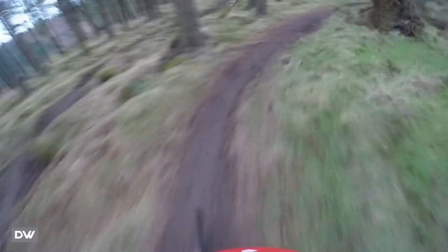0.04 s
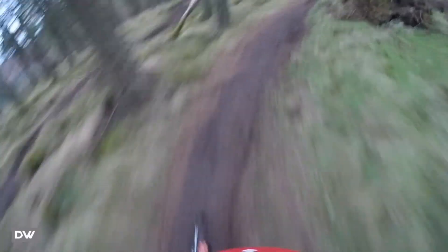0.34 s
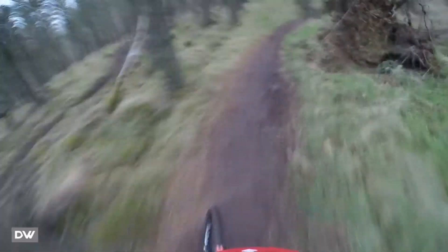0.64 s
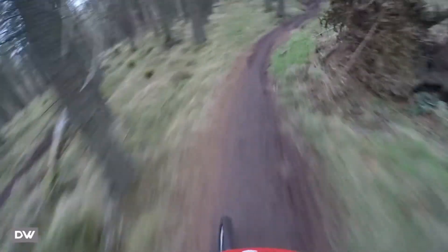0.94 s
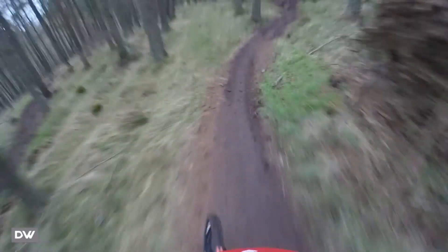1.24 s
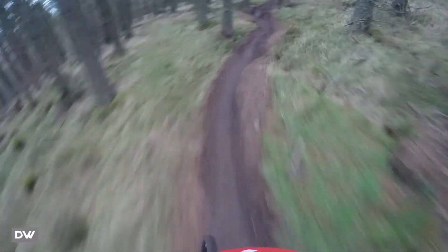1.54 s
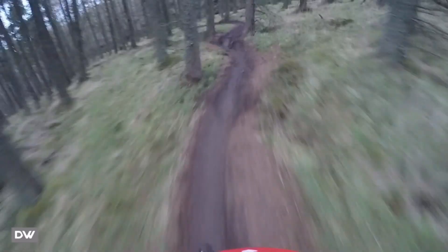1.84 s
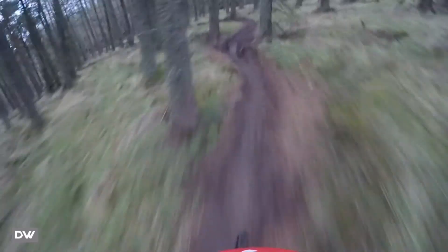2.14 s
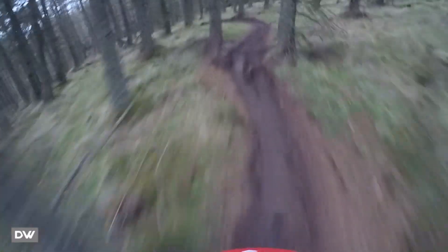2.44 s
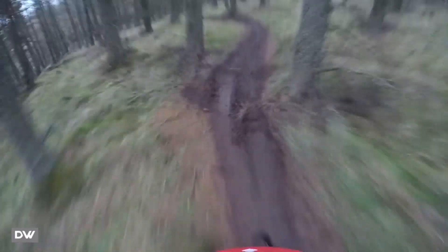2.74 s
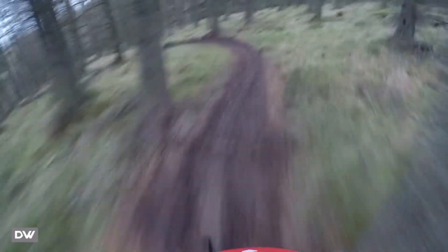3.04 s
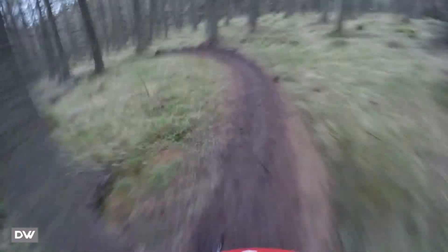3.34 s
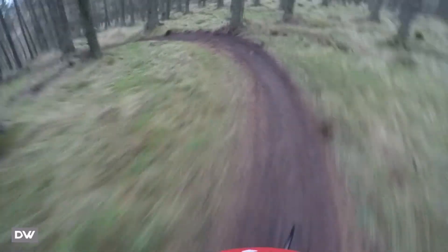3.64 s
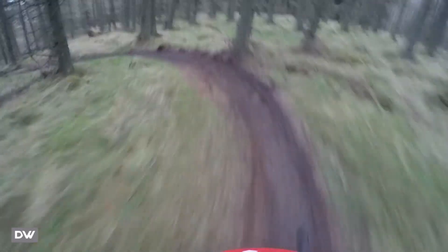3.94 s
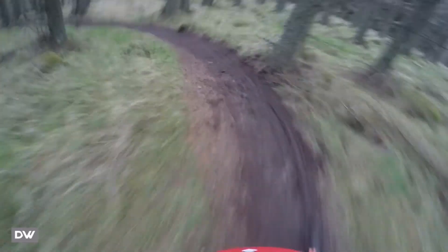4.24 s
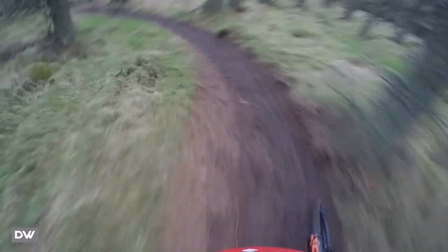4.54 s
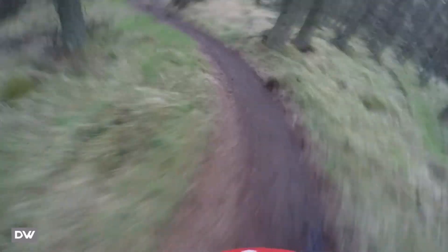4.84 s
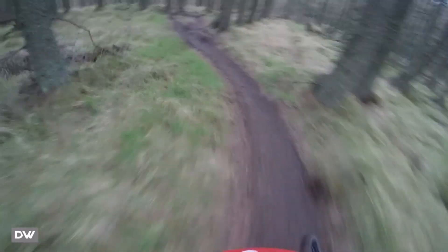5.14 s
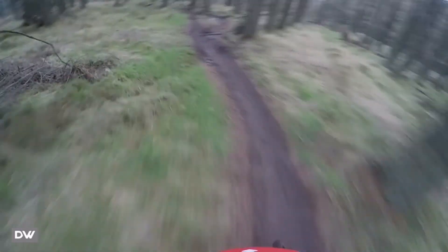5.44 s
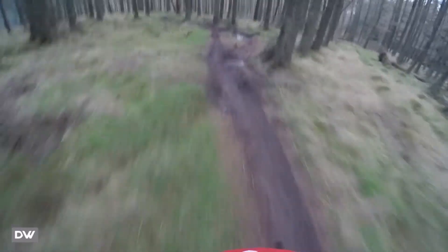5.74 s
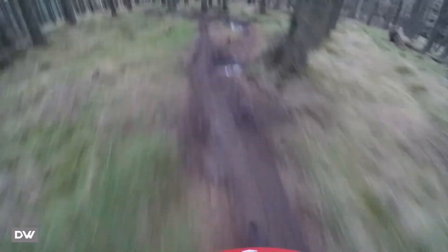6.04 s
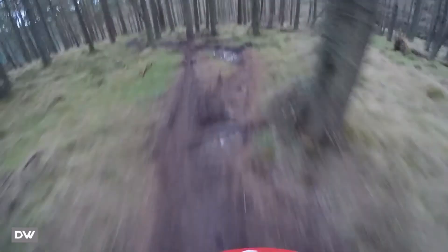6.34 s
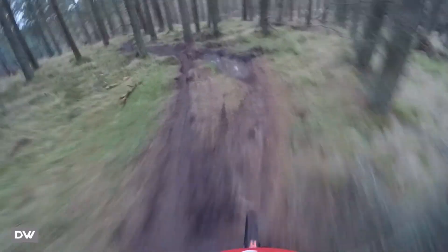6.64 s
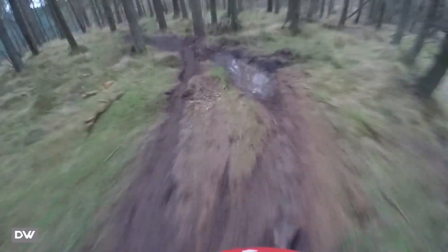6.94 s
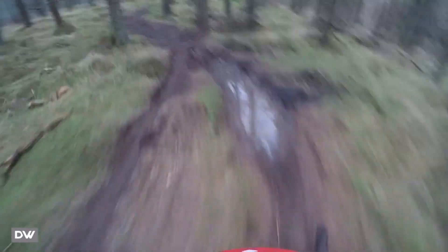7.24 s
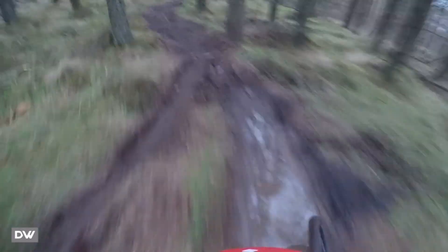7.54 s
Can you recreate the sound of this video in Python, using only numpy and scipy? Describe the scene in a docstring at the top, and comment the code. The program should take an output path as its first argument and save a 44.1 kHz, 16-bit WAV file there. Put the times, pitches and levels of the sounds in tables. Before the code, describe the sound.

Low wind rumble surges and dips right on the microphone as a mountain bike speeds along a wet forest path. Close underneath, the tyres rush and crunch through dirt and fling hissing mud. Quick, irregular knocks and rattles run all the way through. Rough stretches shake everything harder, thumping the suspension and slapping the chain, then ease briefly, while stones ping and grit ticks against the frame.

```python
"""A muddy forest trail, taken fast on a mountain bike; the microphone is in a cased camera on the rider.
Wind buffets the case. Just below, the tyres tear through wet dirt and throw up spray, and every bump
makes the bike knock and rattle. Rough stretches shake everything harder and crests let it ease.
Hard landings thump and set the chain slapping, stones ping under the tread, and now and then
a bit of grit ticks against the frame."""
import sys
import numpy as np
from scipy import signal
from scipy.fft import rfft, irfft
from scipy.io import wavfile
from scipy.ndimage import uniform_filter1d

SR = 44100
rng = np.random.default_rng(int(sys.argv[2]) if len(sys.argv) > 2 else 0)


def transcribe(signal):
    """Save signal, clipped to [-1, 1], as a 16-bit WAV file at the path in sys.argv[1]."""
    frames = np.atleast_2d(signal).T
    limited = np.clip(frames, -1, 1)
    pcm = np.round(limited * 32767).astype(np.int16)
    wavfile.write(sys.argv[1], SR, pcm)


N = 343539

# Crests, where the bike goes light. Each row: middle in seconds, drop in dB, half length in seconds.
CRESTS = [(0.73, 7.5, 0.028), (1.16, 6, 0.05), (1.6, 5.5, 0.059), (2.13, 4, 0.027), (3.71, 7, 0.086),
          (4.68, 2, 0.11), (5.59, 4, 0.16), (6.57, 0.5, 0.036)]


def from_db(db):
    return 10 ** (np.asarray(db) / 20)


def unit_rms(x):
    return x / np.sqrt(np.mean(x ** 2) + 1e-20)


def in_time(rows):
    """One curve per column, joining its values at the times in the first column."""
    times, *columns = np.transpose(rows)
    return [np.interp(np.arange(N) / SR, times, column) for column in columns]


def swell(middle_s, half_s):
    """A bell of height 1 around a moment."""
    distance = (np.arange(N) / SR - middle_s) / half_s
    return np.exp(-np.minimum(distance ** 2, 50) / 2)


def swells(rows):
    """A curve in dB with one bell for each row of middle, height and half length."""
    return sum(db * swell(s, half_s) for s, db, half_s in rows)


def drift(hz):
    """A random wander with spread 1, moving mostly slower than hz."""
    hop, run_in = 40, 2000
    pole = np.exp(-2 * np.pi * hz * hop / SR)
    noise = rng.standard_normal(N // hop + run_in + 2)
    slow = signal.lfilter([1], [1, -2 * pole, pole * pole], noise)[run_in:]
    return np.interp(np.arange(N) / hop, np.arange(len(slow)), unit_rms(slow))


def steady(x, span_s):
    """Holds the rms near 1 over spans of this length and keeps the faster detail."""
    size = max(int(span_s * SR), 2)
    power = uniform_filter1d(uniform_filter1d(x ** 2, size), size)
    return x / np.sqrt(np.abs(power) + 1e-12)


def colour(x, spectrum):
    """Causal filter with the given spectrum; a unit click comes out with height 1."""
    size = 16384
    hz, db = np.transpose(spectrum)
    bins_hz = np.arange(size // 2 + 1) * SR / size
    gain = from_db(np.interp(np.log(bins_hz + 1), np.log(hz), db))
    cepstrum = irfft(np.log(gain))
    cepstrum[1:size // 2] *= 2  # minimum phase: nothing sounds ahead of a click
    response = irfft(np.exp(rfft(cepstrum[:size // 2], size)))
    return signal.fftconvolve(x, response / np.abs(response).max())[:N]


def soften(x, hz):
    """Two-pole low-pass."""
    return signal.sosfilt(signal.butter(2, hz, fs=SR, output="sos"), x)


def ring(clicks, hz, t60):
    """A unit click starts a sine of height 1 that falls 60 dB in t60 seconds."""
    decay, angle = from_db(-60 / (t60 * SR)), 2 * np.pi * hz / SR
    return signal.lfilter([0, np.sin(angle)], [1, -2 * decay * np.cos(angle), decay ** 2], clicks + 1e-18)


def clicks_at(times, heights):
    """A click of the given height at each time."""
    return np.bincount(np.clip(np.round(times * SR).astype(int), 0, N - 1), heights, N)


def grains(per_s, spread_db):
    """Random clicks; a few are much louder if the spread is positive, much softer if negative."""
    sizes = from_db(spread_db * np.minimum(rng.exponential(1, N), 4))
    return sizes * rng.choice([-1, 1], N) * (rng.random(N) < per_s / SR)


def shaking():
    """Rough stretches raise the shaking and crests lower it; in dB above smooth trail."""
    # Each row: middle in seconds, rise in dB, half length in seconds.
    rough_stretches = [(0.59, 4, 0.075), (1.053, 9, 0.023), (1.82, 6.5, 0.035), (2.99, 3.5, 0.11),
                       (3.4, 9.5, 0.026), (4.13, 3, 0.058), (4.947, 6, 0.031), (5.192, 5, 0.018),
                       (6.31, 3.5, 0.11), (6.777, 11.5, 0.023), (7.02, 5.5, 0.04), (7.644, 4.5, 0.069)]
    return swells(rough_stretches) - swells(CRESTS)


def tyre_load():
    """How hard the tyres work the dirt, in dB: more where they slip and scrape, less over crests."""
    # Each row: time in seconds, level of the tyres' rush in dB.
    effort = [(0.0, -51), (0.39, -49), (0.56, -52), (1.65, -52), (2.37, -52), (2.65, -51), (3.12, -52),
              (3.71, -52.5), (4.1, -50.5), (4.47, -56.5), (4.77, -55), (5.05, -59), (5.38, -53.5),
              (5.77, -51.5), (5.9, -48.5), (6.2, -52), (6.6, -54), (6.9, -48), (7.33, -53.5), (7.79, -50)]
    # Each row: middle of a slip in seconds, rise in dB.
    scrapes = [(0.018, 9), (0.29, 3.5), (2.3, 6.5), (2.69, 2.5), (3.154, 3), (6.71, 4), (7.24, 1)]
    effort_db, = in_time(effort)
    scrape_db = sum(db * swell(s, half_s=0.032) for s, db in scrapes)
    return effort_db + scrape_db - 0.38 * swells(CRESTS)


def bike_body(clicks, brightness_db, vary_db, pitch=1):
    """Each contact strikes the bike's modes with its own strengths; they radiate little below pitch."""
    # Each row: frequency in Hz, level in dB, seconds to fall 60 dB.
    modes = [(214.6, -18.5, 0.14), (328, -23, 0.015), (503, -20, 0.061), (754, -28, 0.12),
             (1010, -18.5, 0.029), (1084, -12.5, 0.028), (1282, -7.5, 0.021), (1350, -27, 0.0059),
             (1915, -18, 0.031), (2300, -5, 0.017), (2800, -12, 0.014), (4030, -21, 0.026),
             (4740, -23.5, 0.015)]
    out = np.zeros(N)
    for hz, db, t60 in modes:
        treble_db = brightness_db if hz > 1700 else 0
        strength = from_db(db + treble_db + vary_db * drift(hz=52))
        radiation = signal.butter(1, 0.7 * hz, "high", fs=SR)
        out += signal.lfilter(*radiation, ring(clicks * strength, hz * pitch, t60))
    return out


def whine():
    """A faint, wavering metallic tone runs along with the bike."""
    return from_db(-74) * unit_rms(ring(rng.standard_normal(N), hz=1956, t60=0.17))


def air_hiss(shake_db):
    """Passing air hisses thinly, a little louder on rough ground."""
    # Each row: frequency in Hz, level in dB.
    spectrum = [(4000, 5), (7800, 3), (8800, -4), (9400, 0.5), (10900, 1.5), (11900, -5), (15500, -16)]
    return from_db(-69.5 + 0.11 * shake_db) * unit_rms(colour(rng.standard_normal(N), spectrum))


def wind(shake_db):
    """Eddies push on the case, right at the microphone: deep, lumpy pressure swings."""
    # Each row: frequency in Hz, level in dB.
    spectrum = [(8, -7.5), (16, 3.5), (24, 0), (36, -5), (44, -9.5), (53, -9), (65, -25), (80, -34.5),
                (100, -41.5), (130, -46.5), (200, -52.5), (400, -67.5), (1000, -100)]
    # The buffeting dips for an instant. Each row: middle in seconds, drop in dB (negative is a rise).
    dips = [(0.47, 6.5), (1.16, 3), (1.45, 4.5), (2.14, 10.5), (2.52, 0), (3.10, 2), (3.74, -1.5),
            (4.72, 2.5), (5.55, 6), (5.78, 9), (6.63, 3), (6.89, 6), (7.18, 1.5), (7.33, 2.5), (7.45, 5)]
    dip_db = sum(db * swell(s, half_s=0.03) for s, db in dips)
    eddies = rng.standard_normal(N) * from_db(4 * drift(hz=26.7))
    return from_db(-19 + shake_db - dip_db) * steady(colour(eddies, spectrum), span_s=0.11)


def frame_drone(shake_db, hz=204.7, t60=0.029):
    """The frame drones hollowly with the shaking ground and booms briefly in the ruts."""
    # Each row: middle of a boom in seconds, level in dB.
    ruts = [(0.61, -46.5), (1.03, -45), (1.82, -58), (2.23, -53), (2.42, -48.5), (2.59, -49), (3.54, -46),
            (4.79, -51), (4.84, -54), (6.18, -51), (6.66, -47)]
    drone = from_db(-68.5 + 0.41 * shake_db + 5 * drift(hz=17))
    booms = sum(from_db(db) * swell(s, half_s=0.014) for s, db in ruts)
    hollow = ring(ring(rng.standard_normal(N), hz, t60), hz, t60)
    return (drone + booms) * steady(hollow, span_s=0.074)


def spray(load_db, shake_db):
    """Fine mud flung off the tread hisses, more so under load and in wetter patches."""
    # Each row: frequency in Hz, level in dB.
    spectrum = [(1500, -20), (3100, 5.5), (3700, -14.5), (4040, 4), (4280, -3), (4560, 1), (5300, -3.5),
                (6050, -8.5), (6400, -7), (7000, -12), (10000, -17), (15500, -19)]
    # Each row: middle in seconds, rise in dB, half length in seconds.
    wet_patches = [(0.78, 5.5, 0.082), (2.3, 0, 0.044), (2.93, 7.5, 0.07), (3.49, 5.5, 0.21),
                   (4.16, 5, 0.037), (4.55, 6, 0.27), (7.68, 8, 0.03)]
    level_db = -65.5 + 0.77 * (load_db - load_db.mean()) + 0.2 * shake_db + swells(wet_patches)
    droplets = colour(grains(per_s=11000, spread_db=-2.5), spectrum)
    flutter_db = 3 * drift(hz=20)
    return from_db(level_db + flutter_db) * steady(droplets, span_s=0.066)


def grit(scatter_s=0.0042):
    """Grit hits the frame with a bright tick and scatters at once."""
    # Each row: start in seconds, relative level in dB.
    strikes = [(0.36, -55.5), (1.729, -54), (2.788, -58), (2.87, -55), (2.995, -62), (3.377, -57),
               (4.832, -55.5), (4.943, -56), (6.356, -55), (6.885, -54), (7.618, -51), (7.692, -57.5)]
    # Each row: frequency in Hz, level in dB.
    spectrum = [(600, -9), (1400, 8), (2600, 13.5), (3600, 6), (4700, 5.5), (6500, -5.5), (8600, -6),
                (15000, -43)]
    times, db = np.transpose(strikes)
    hits = clicks_at(times, from_db(db + 7.5))
    tails = signal.lfilter([1], [1, -np.exp(-1 / (scatter_s * SR))], hits + 1e-18)
    crumbs = from_db(-4) * tails * rng.standard_normal(N)
    return colour(hits + crumbs, spectrum)


def rattle(load_db, shake_db):
    """Loose parts keep tapping, harder as the tyres work and the ground roughens."""
    taps = bike_body(grains(per_s=260, spread_db=-1), brightness_db=-5.5, vary_db=6)
    level_db = -31.5 + 0.5 * load_db + 0.7 * shake_db
    return from_db(level_db) * steady(soften(taps, hz=3350), span_s=0.73)


def chain():
    """The shaken chain slaps the frame: its links clash in a short swell and leave a thin ring."""
    # Each row: middle in seconds, level in dB, half length in seconds.
    slaps = [(0.607, -48.5, 0.021), (1.047, -42, 0.012), (3.374, -44, 0.0041), (3.413, -44.5, 0.0048),
             (3.472, -52, 0.011), (3.52, -48.5, 0.017), (4.09, -45.5, 0.012), (4.893, -47.5, 0.026),
             (4.947, -41, 0.011), (5.004, -46, 0.016), (5.055, -40, 0.0095), (5.124, -46, 0.029),
             (7.05, -45, 0.01), (7.63, -55, 0.014), (7.684, -49, 0.0061)]
    # Each row: frequency in Hz, level in dB.
    spectrum = [(150, 1), (650, -4), (1300, 9.5), (1800, -3.5), (2450, 11), (3100, 0.5), (3700, -9.5),
                (4050, 0), (4280, -9.5), (4640, 1), (5000, -6), (6350, -10), (8500, -26.5), (10800, -22),
                (15000, -27)]
    bursts = sum(from_db(db) * swell(s, half_s) for s, db, half_s in slaps)
    links = colour(grains(per_s=7000, spread_db=1), spectrum)
    clash = bursts * steady(links, span_s=0.077)
    ringing = unit_rms(ring(clash, hz=4630, t60=0.031))
    return clash + from_db(-17.5) * np.std(clash) * ringing


def stones(load_db):
    """Stones snap out from under the tread and ring briefly: a few clear pings over a fine crackle."""
    # Each row: start in seconds, level in dB, pitch in Hz.
    pinched_stones = [(0.113, -42, 2800), (0.283, -35, 2850), (0.510, -36, 2300), (0.589, -36, 2340),
                      (3.154, -34.5, 2520), (3.207, -42, 2700), (3.235, -35, 2710), (3.304, -37, 3000),
                      (6.346, -35, 2630)]
    pings = sum(ring(clicks_at(np.array([s]), from_db([db])), hz, t60=0.017)
                for s, db, hz in pinched_stones)
    gravel = from_db(-44.5 + load_db - load_db.mean()) * grains(per_s=70, spread_db=1.87)
    pitches_hz = np.geomspace(1280, 3160, 12)
    pitch_index = rng.integers(0, len(pitches_hz), N)
    crackle = sum(ring(gravel * (pitch_index == k), hz, t60=0.0067) for k, hz in enumerate(pitches_hz))
    return soften(pings + crackle, hz=4500)


def tyres(load_db):
    """Knobs pull out of wet dirt: a dense rush with coarser crunching in it."""
    # Each row: frequency in Hz, level in dB.
    spectrum = [(90, -28), (170, -3.5), (215, -4), (290, -7.5), (620, -11), (850, -12), (1270, -2),
                (1800, -6), (2050, -5), (2320, -1), (3180, -7.5), (3650, -18), (4500, -19), (8000, -43.5)]
    rush = rng.standard_normal(N)
    crunch = from_db(-4) * unit_rms(grains(per_s=600, spread_db=1.5))
    flutter_db = 2 * drift(hz=21)
    return from_db(load_db + 0.5 + flutter_db) * steady(colour(rush + crunch, spectrum), span_s=0.012)


def thumps():
    """The suspension compresses hard: a deep thump reaches the camera and the hollow low modes wake."""
    # Each row: start in seconds, relative level in dB.
    compressions = [(0.033, -11), (0.511, -21), (1.007, -10), (1.046, -13), (1.068, -14), (1.812, -23),
                    (2.421, -22.5), (2.602, -16), (3.533, -7.5), (4.085, -17.5), (4.134, -15.5),
                    (5.049, -10.5), (6.742, -20.5), (7.042, -22.5)]
    times, db = np.transpose(compressions)
    jolts = clicks_at(times, from_db(db))
    thump = soften(ring(jolts, hz=47.65, t60=0.22), hz=124)
    clunk = soften(bike_body(jolts, brightness_db=11, vary_db=7), hz=328)
    return thump + from_db(-9) * clunk


def knocks(pebbles_per_s=7, pebble_db=-46, pebble_brightness_db=2, detune=0.035):
    """Roots, stones and random pebbles knock the bike through soft rubber, each with a weak rebound."""
    # The loudest knocks. Each row: start in seconds, relative level in dB, brightness in dB.
    roots_and_stones = [(0.032, -45, -22), (0.1738, -37, -19), (0.352, -33.5, -11), (0.4355, -37, 4.5),
                        (0.514, -36, 1), (0.6, -31, -7), (0.6482, -36, -12), (0.819, -38, 1.5),
                        (0.861, -35.5, -11), (0.889, -34.5, -12), (0.999, -26, -17), (1.0391, -26, -19),
                        (1.046, -29, -10), (1.07, -36, -12), (1.122, -37.5, -2), (1.177, -35.5, -11),
                        (1.2307, -35, -6), (1.324, -34, -8), (1.3732, -37, -4), (1.79, -33.5, -10),
                        (1.813, -32.5, -2.5), (1.8932, -35, -14), (2.150, -36, -3), (2.218, -34.5, -9),
                        (2.320, -35, 0), (2.328, -39, 1), (2.402, -36, -2), (2.583, -32, -19),
                        (2.7717, -37, -8), (3.2574, -40, 1), (3.5169, -36.5, 2.5), (3.53, -24.5, -10),
                        (3.865, -37, -4), (4.0784, -36, -3), (4.083, -34, -8), (4.142, -36, -16),
                        (4.1868, -31.5, -7), (4.485, -35.5, -6), (4.541, -37.5, -11), (4.5883, -37.5, 0),
                        (4.6755, -31.5, -11), (4.770, -39.5, -4), (4.813, -35.5, -2), (4.850, -35, -6),
                        (4.910, -33, -9), (5.0464, -28.5, -5), (5.148, -33, -8), (5.215, -33, -22),
                        (5.2442, -38, -4), (5.3372, -36.5, -5), (5.6872, -33.5, -10), (5.804, -38, -0.5),
                        (6.1647, -32.5, -13), (6.435, -34.5, -2.5), (6.6472, -35.5, -6),
                        (6.7396, -32.5, -10), (6.894, -35, -2), (6.9488, -37, -15), (7.0384, -30.5, -3),
                        (7.050, -27, -3.5), (7.3215, -36.5, -3.5), (7.386, -36, -11), (7.538, -44, 7),
                        (7.72, -37, -15)]
    pebble_times = np.cumsum(rng.gamma(2, 0.5, 200)) / pebbles_per_s
    pebbles = [(s, pebble_db, pebble_brightness_db) for s in pebble_times if s < N / SR]
    bumps = sorted([tuple(row) for row in roots_and_stones] + pebbles)
    times, db, _ = np.transpose(bumps)
    _, brightness_db = in_time(bumps)
    rebound_times = times + rng.uniform(0.00244, 0.008, len(times))
    places = rng.choice([-1, 0, 1], len(times))  # the ring shifts in pitch with the place struck
    out = np.zeros(N)
    for place in (-1, 0, 1):
        heights = from_db(db) * (places == place)
        contacts = clicks_at(times, heights) + from_db(-9.5) * clicks_at(rebound_times, heights)
        out += bike_body(contacts, brightness_db + 2, vary_db=1.5, pitch=1 + detune * place)
    return from_db(6) * soften(out, hz=3500)


def scene():
    """Air, dirt and bike, all close and in mono, driven by tyre load and rough ground."""
    load_db, shake_db = tyre_load(), shaking()
    air = air_hiss(shake_db) + wind(shake_db)
    ground = tyres(load_db) + spray(load_db, shake_db)
    bike = rattle(load_db, shake_db) + knocks() + frame_drone(shake_db) + thumps() + chain()
    ticks = grit() + stones(load_db)
    return (air + ground + bike + ticks + whine())[None]


def record(dry, cutoff_hz=15450, fade_s=0.015):
    """The top is cut steeply; the sound opens and closes without a click."""
    from_edge = np.minimum(np.arange(N), np.arange(N)[::-1])
    fade = np.minimum(from_edge / (fade_s * SR), 1)
    low_pass = signal.ellip(10, 0.1, 80, cutoff_hz, fs=SR, output="sos")
    return fade * signal.sosfilt(low_pass, dry)


dry = scene()
out = record(dry)
transcribe(out)
```